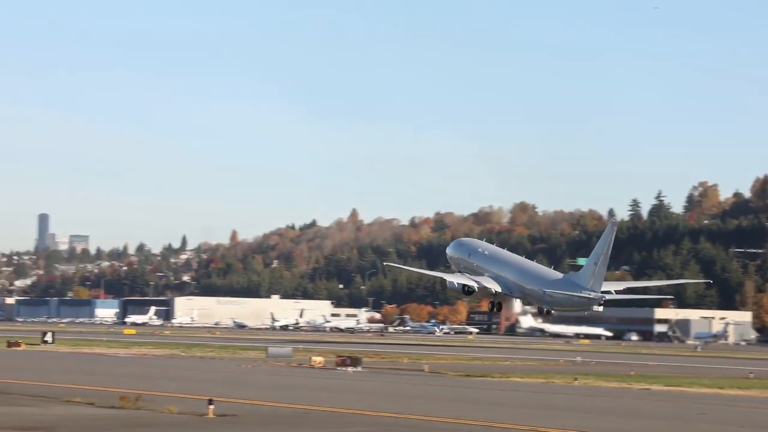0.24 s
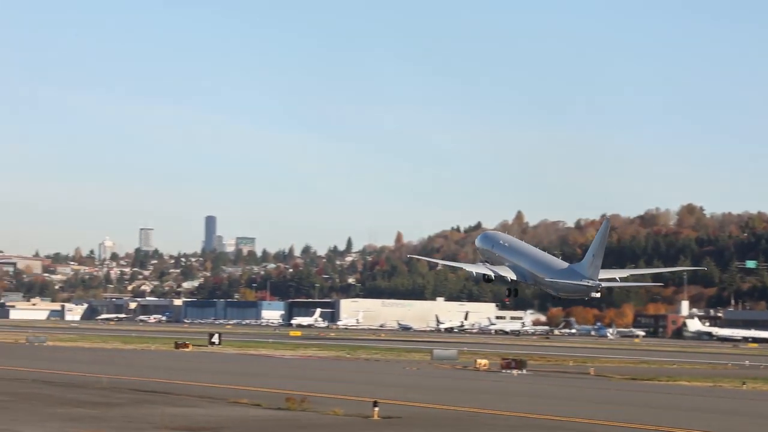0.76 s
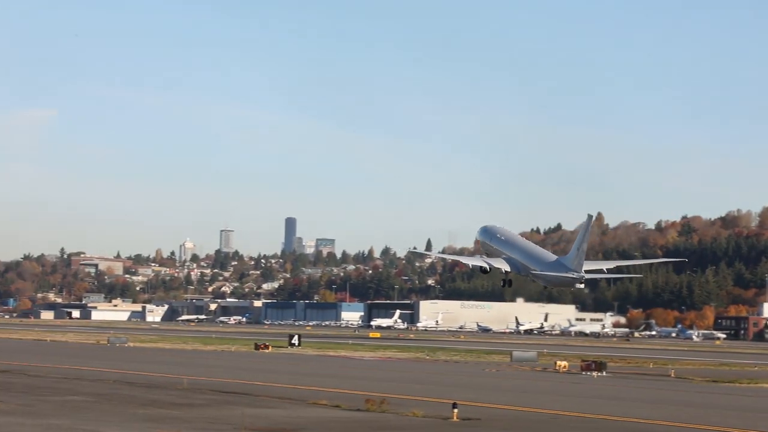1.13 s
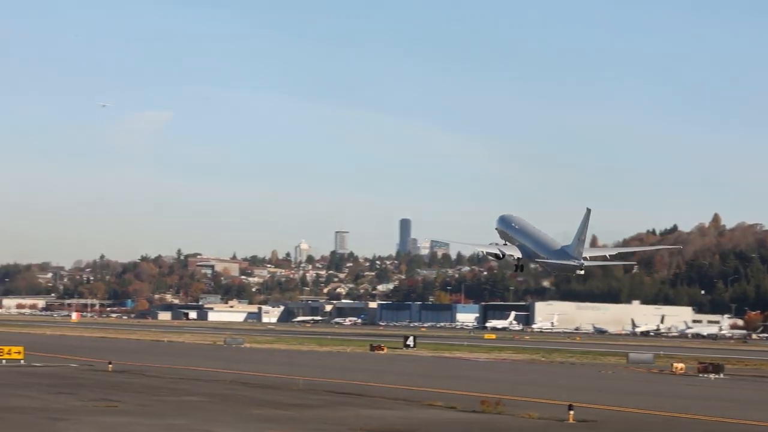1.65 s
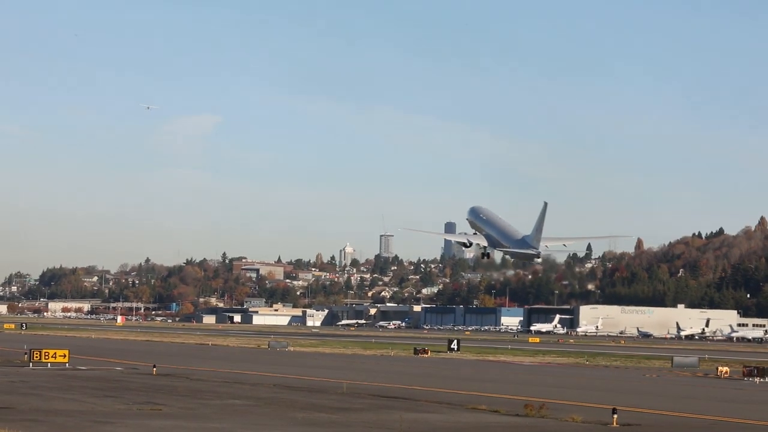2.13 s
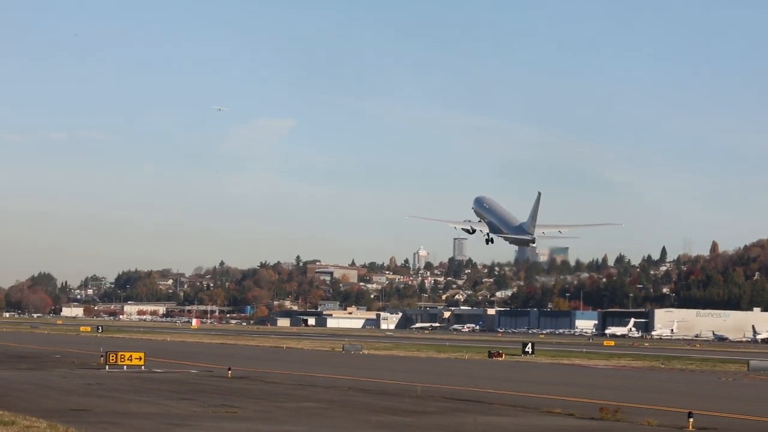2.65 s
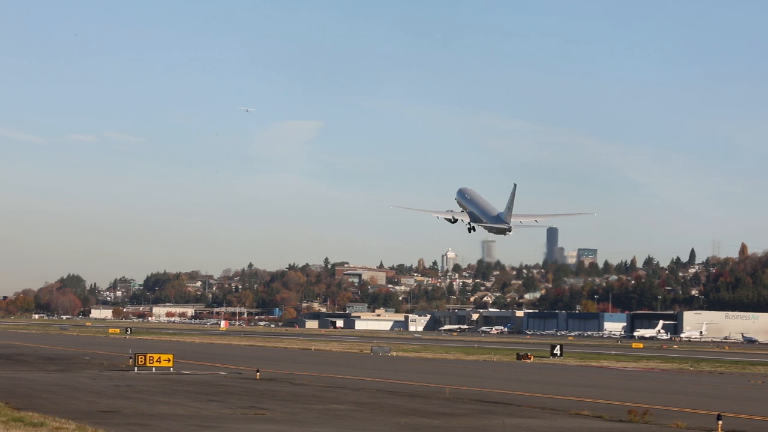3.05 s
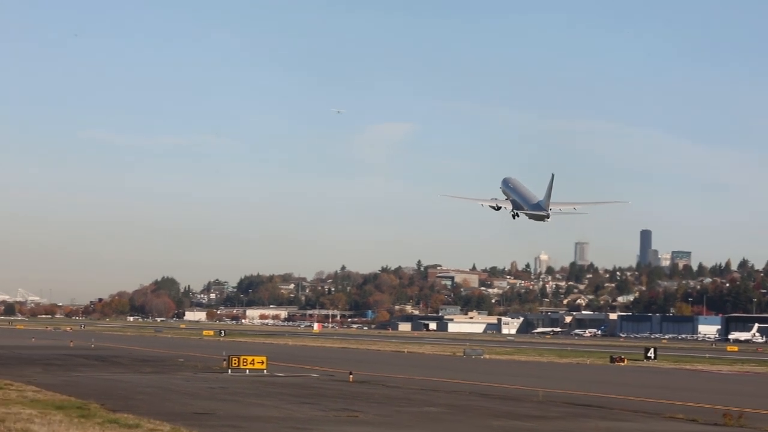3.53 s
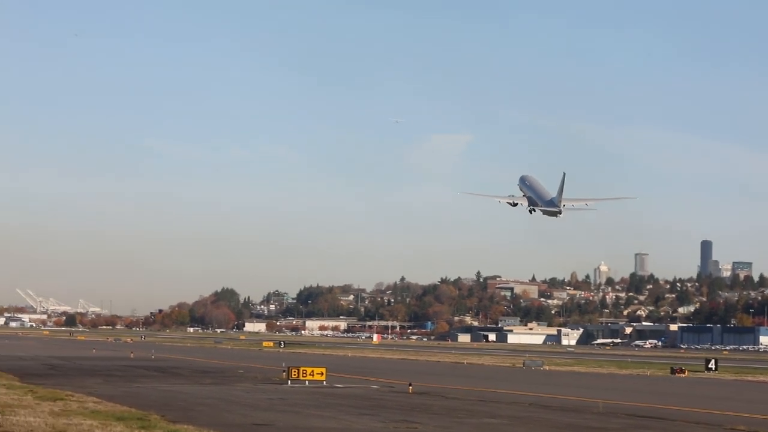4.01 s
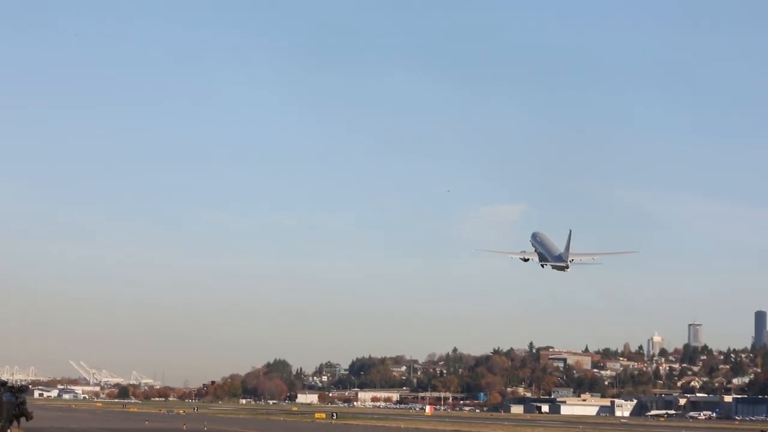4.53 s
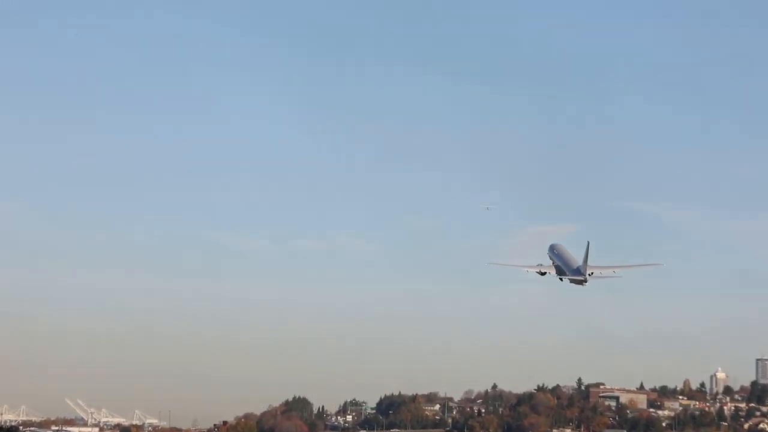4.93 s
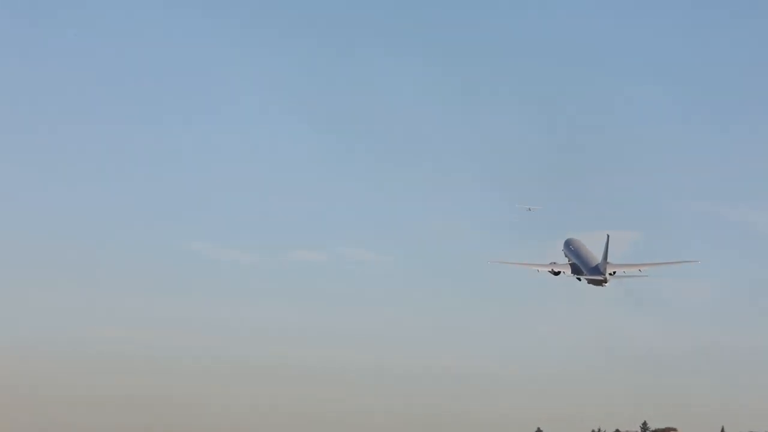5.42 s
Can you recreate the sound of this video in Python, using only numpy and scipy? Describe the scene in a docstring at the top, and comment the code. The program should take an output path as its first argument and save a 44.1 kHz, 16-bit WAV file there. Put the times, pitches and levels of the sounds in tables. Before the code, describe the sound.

A jet airliner has just lifted off and climbs away. It starts with a loud deep rumble, broad roar and airy hiss, already receding. The roar swells and flutters unevenly, its treble dulls, and the hiss drops near four seconds. Just after three seconds a camera part clicks sharply beside the microphone, amid barely audible lens ticks. Open airfield, with a hollow tarmac reflection and low roar returning from around.

```python
"""Jet climbing away from a runway

A jet climbs away, heard from the ground behind it. All its sound is noise shaped by frequency:
a deep rumble, a broad roar, and a hiss that the air dulls as the distance grows.
The echo off the tarmac cuts notches that sink over time. A low roar also comes back from around the field.
Close by, a camera clicks once (short ringing tones), and it and its lens motor tick faintly (noise bursts)."""
import sys
import numpy as np
from scipy import signal
from scipy.fft import rfft, irfft, next_fast_len
from scipy.io import wavfile
from scipy.ndimage import uniform_filter1d, map_coordinates

SR = 44100
rng = np.random.default_rng(int(sys.argv[2]) if len(sys.argv) > 2 else 0)


def digitize_waveform(pressure):
    """Quantize a signal to 16-bit integers and store it at the path in sys.argv[1].

    Rows of a 2-D input are taken as channels; values are limited to [-1, 1].
    """
    field = np.atleast_2d(pressure).T
    bounded = np.clip(field, -1, 1)
    quanta = np.round(bounded * 32767).astype(np.int16)
    wavfile.write(sys.argv[1], SR, quanta)


N = 250047

# Colour of the faint microphone hiss: (frequency [Hz], relative level per Hz [dB])
MIC_HISS_SPECTRUM = [(4000, 1.5), (11800, -.5), (12200, -28), (15000, -48)]
# Colour of the low roar coming back from around the field: (frequency [Hz], relative level per Hz [dB])
FIELD_SPECTRUM = [(15, -26.7), (28, -12), (48, 2.5), (80, -0.6), (150, -7), (260, -11), (330, -14),
                  (430, -25.6), (700, -44.5), (2000, -93.5)]
# Separate dry ticks of the camera: single ticks, and the stronger lens motor steps:
# (time [s], level [dB])
DRY_TICKS = [(.2645, -73), (.3483, -72), (.581, -76), (.649, -76), (1.8903, -79), (1.9411, -76.5),
             (1.9586, -76.5), (2.028, -78), (2.0464, -72), (3.0657, -78), (3.1485, -76), (3.3151, -76),
             (3.3979, -76), (5.4738, -60)]
# Runs of faint lens motor steps: (start [s], end [s], average level [dB])
LENS_STEP_RUNS = [(1.889, 2.1, -86), (3.05, 3.43, -79)]
# Colour of the steps in the runs: (frequency [Hz], relative level per Hz [dB])
STEP_SPECTRUM = [(2000, -9.5), (4500, 2), (5600, -8), (7400, -4.5), (9500, -16), (12000, -27.5),
                 (13000, -45)]
# Colour of the separate dry ticks: (frequency [Hz], relative level per Hz [dB])
TICK_SPECTRUM = [(2000, -12.5), (3700, -1.5), (4700, -7.5), (5400, -5), (6000, 3.5), (7000, -3),
                 (8000, -13), (9700, -2), (11000, -9), (12000, -22), (12800, -45)]
# Sharp click by the microphone: (time [s], level [dB])
SHARP_CLICKS = [(3.2327, -19)]
# Ringing tones of the small hard part that clicks:
# (frequency [Hz], level within the click [dB], time to fall 60 dB [s])
CLICK_TONES = [(2420, 5, .0065), (2763, 3, .0084), (2995, -8.9, .015), (3614, -13.3, .018),
               (4334, -9.5, .0145), (5740, -27.5, .013), (6203, -25.3, .014), (7385, -25, .011),
               (7300, -48, .08), (9004, -24.7, .007), (9505, -26.4, .0078), (11450, -18.2, .0034),
               (13175, -33, .007), (14238, -18, .0024)]
# Colour of the deep rumble: (frequency [Hz], relative level per Hz [dB])
RUMBLE_SPECTRUM = [(20, -31), (40, -16.5), (62, -0.7), (90, 0.15), (130, 1), (200, -3.5), (280, -13.5),
                   (400, -23.5), (800, -93.5)]
# Colour of the mid-range roar: (frequency [Hz], relative level per Hz [dB])
ROAR_SPECTRUM = [(100, -10.5), (300, -1.2), (500, -3.5), (780, -2), (1000, -5), (1300, -7), (1750, -13.5),
                 (2200, -24), (3000, -30), (3600, -35.5), (4200, -50), (5200, -55.5), (7000, -71)]
# Colour of the exhaust hiss: (frequency [Hz], relative level per Hz [dB])
HISS_SPECTRUM = [(200, -11.5), (500, -3), (900, -10.5), (1230, -10.5), (1600, -20), (1950, -12.5),
                 (2500, -18), (3150, -19), (3500, -27.5), (4000, -33.5), (4600, -38), (5500, -47),
                 (7000, -58.5), (11000, -90)]
# Level of the roar before the swells: (time [s], level [dB])
ROAR_LEVELS = [(0.0, -37.5), (0.6, -41), (1.1, -46), (1.6, -43), (2.2, -46.7), (3.15, -42.9), (3.7, -44),
               (4.4, -45.5), (5.67, -44)]
# The hiss surges as the air carries it better: (time [s], half length [s], gain [dB])
HISS_SURGES = [(0.167, .07, 1), (.45, 0.057, 2), (1.201, 0.17, 2), (5.33, 0.12, 3.5)]
# Roar and hiss swell or dip for a moment in one band:
# (time [s], half length [s], centre frequency [Hz], gain [dB])
BAND_SWELLS = [(0.078, 0.2, 596, 1.5), (.1, .2, 4080, 1.5), (.65, 0.17, 135, 2), (0.858, .14, 85, 6),
               (1.101, 0.38, 817, 5.5), (1.148, .35, 245, 7.5), (1.5, 1, 4700, -3.7), (1.702, 0.44, 441, 8),
               (2.15, .4, 154, 3.5), (2.6, .5, 522, 2), (2.7, .65, 1265, 5.5), (3.1, .6, 860, -2),
               (3.299, .7, 305, 5.5), (4.25, .2, 72, 2), (4.9, .5, 178, 5), (5.45, .5, 790, 3),
               (5.5, .35, 1600, 3.2)]
# Share of the tarmac echo that stays in step with the direct sound: (frequency [Hz], share [0-1])
ECHO_SHARE = [(100, 0.31), (175, 0.92), (300, 0.42), (450, .4), (800, .18), (1300, 0)]

STEPS_PER_S = 60  # lens motor steps in a run
# Flight path: distance to the side, distance already past the listener at 0 s, speed
SIDE_M, PAST_M, SPEED_M_PER_S = 90, 181, 74.3
# Base levels, before the changes over time
RUMBLE_DB, HISS_DB = -20, -38.5
# The tail turns to the listener: middle of the turn, how gradual it is, drop of the hiss
TAIL_ON_S, TURN_S, HISS_DROP_DB = 3.82, .26, 17.5
AIR_DB_PER_KHZ_M = 0.0157  # treble loss per kHz above the knee and per metre flown away
SWELL_OCTAVES = .26  # half width of a swell in pitch
# Delay of the echo: at 0 s, then its growth with time and with time squared
LAG_MS, LAG_GROWTH_MS_PER_S, LAG_GROWTH_MS_PER_S2 = 0.65, 0.25, 0.027
TOP_HZ = 16800  # nothing is kept above this


def amp(db):
    """Turn decibels into a gain."""
    return 10 ** (np.asarray(db) / 20)


def unit(x):
    """Scale to an average strength (rms) of 1."""
    return x / np.sqrt(np.mean(x ** 2) + 1e-20)


def along(points, hz):
    """Read a table of (frequency, value) points on a log frequency axis."""
    point_hz, values = np.transpose(points)
    return np.interp(np.log(hz + 1), np.log(point_hz + 1), values)


def wobble(rate):
    """A smooth random curve through 'rate' random points a second."""
    points = rng.standard_normal(int(N * rate / SR) + 4)
    return map_coordinates(points, [np.arange(N) * rate / SR])


def filtered(x, response):
    """Pass x through a gain that depends on frequency only."""
    size = next_fast_len(N + SR // 4)
    hz = np.fft.rfftfreq(size, 1 / SR)
    return irfft(rfft(x, size) * response(hz), size)[:N]


def swept(x, gain):
    """Pass x through a gain that changes with frequency and time."""
    hz, t, spectrum = signal.stft(x, SR, nperseg=1024, noverlap=768)
    _, shaped = signal.istft(spectrum * gain(hz[:, None], t), SR, nperseg=1024, noverlap=768)
    return shaped[:N]


def turbulence(spectrum):
    """Random noise coloured by a spectrum table, at rms 1."""
    white = rng.standard_normal(N)
    return unit(filtered(white, lambda hz: amp(along(spectrum, hz))))


def airfield(level_db=-33.5):
    """Low roar rolls back from hangars and hillside: coloured noise at a steady level."""
    return amp(level_db) * turbulence(FIELD_SPECTRUM)


def tick_envelope(rows, t60, attack_s=.0003):
    """A quick rise and a decay (60 dB in t60 seconds) for each (time, level) row."""
    t = np.arange(SR // 20) / SR
    out = np.zeros(N + SR)
    for start, db in rows:
        burst = amp(db - 60 * t / t60) * (1 - np.exp(-t / attack_s))
        out[round(start * SR):][:len(t)] += burst
    return out[:N]


def handling(tick_t60=.014, step_t60=.032, scatter_db=2):
    """Dry camera ticks are noise bursts without ring; runs of lens steps are even in time, not in level."""
    steps = []
    for start, end, db in LENS_STEP_RUNS:
        for s in np.arange(start, end, 1 / STEPS_PER_S):
            steps.append((s, db + scatter_db * rng.standard_normal()))
    ticks = tick_envelope(DRY_TICKS, tick_t60) * turbulence(TICK_SPECTRUM)
    return ticks + tick_envelope(steps, step_t60) * turbulence(STEP_SPECTRUM)


def clicks(attack_s=0.00083, crack_db=-35, crack_t60=0.009, tail_db=-60, tail_t60=.05, dull_hz=14000):
    """A tiny noise crack with a few short ringing tones leaves a faint noisy tail."""
    out = np.zeros(N + SR)
    t = np.arange(SR // 8) / SR
    for start, db in SHARP_CLICKS:
        ring = sum(amp(level - 60 * t / t60) * np.sin(2 * np.pi * hz * t)
                   for hz, level, t60 in CLICK_TONES)
        crack_decay = amp(crack_db - 60 * t / crack_t60)
        tail_decay = amp(tail_db - 60 * t / tail_t60)
        crack = (crack_decay + tail_decay) * rng.standard_normal(len(t))
        out[round(start * SR):][:len(t)] += amp(db) * (ring + crack) * (1 - np.exp(-t / attack_s))
    return filtered(out[:N], lambda hz: 1 / np.sqrt(1 + (hz / dull_hz) ** 6))


def distance(t):
    """Metres along the ground from listener to jet: steady speed, fixed distance to the side."""
    return np.hypot(SIDE_M, PAST_M + SPEED_M_PER_S * t)


def spreading_db(t):
    """Sound pressure falls as one over the distance; 0 dB at the start."""
    return 20 * np.log10(distance(0) / distance(t))


def tail_on(t):
    """Glide from 0 (jet heard from the side) to 1 (heard from behind)."""
    return 1 / (1 + np.exp((TAIL_ON_S - t) / TURN_S))


def air_loss(hz, t, knee_hz=2620):
    """The air soaks up the top of the hiss, more so as the jet gets farther away."""
    khz_above_knee = np.maximum(hz - knee_hz, 0) / 10 ** 3
    return amp(-AIR_DB_PER_KHZ_M * (distance(t) - distance(0)) * khz_above_knee)


def shimmer(x, depth_db):
    """Uneven air along the path strengthens and weakens random patches of the spectrum."""
    def patches(hz, t):
        """Random gains, smoothed over frequency and then over time."""
        field = uniform_filter1d(rng.standard_normal((len(hz), len(t))), size=9, axis=0)
        return amp(depth_db * unit(uniform_filter1d(field, size=18, axis=1)))
    return unit(swept(x, patches))


def swells(hz, t):
    """Gain of the passing swells and dips, smooth in time and pitch."""
    total_db = 0
    for s, half_s, centre_hz, db in BAND_SWELLS:
        octaves = np.log2((hz + 1) / centre_hz)
        total_db = total_db + db * np.exp(-((t - s) / half_s) ** 2 - (octaves / SWELL_OCTAVES) ** 2)
    return amp(total_db)


def ground_echo(hz, t, phase=1.16):
    """Direct and reflected sound interfere; the ground turns the phase [rad] and the lag grows."""
    lag_ms = LAG_MS + LAG_GROWTH_MS_PER_S * t + LAG_GROWTH_MS_PER_S2 * t ** 2
    share = np.clip(along(ECHO_SHARE, hz), 0, .95)
    return np.sqrt(1 + share * np.cos(2 * np.pi * hz * lag_ms / 10 ** 3 + phase))


def rumble(throb_db=0.57, build_db=2.9, build_s=0.27):
    """Large eddies make low noise that builds as the plume swings this way, throbs and fades away."""
    t = np.arange(N) / SR
    build_up_db = -build_db * np.exp(-t / build_s)
    level_db = RUMBLE_DB + spreading_db(t) + build_up_db + throb_db * wobble(14)
    return amp(level_db) * turbulence(RUMBLE_SPECTRUM)


def exhaust():
    """Finer eddies make roar and hiss; the hiss goes sideways, so it drops as the tail turns to us."""
    t = np.arange(N) / SR
    roar_db = np.interp(t, *np.transpose(ROAR_LEVELS))
    surge_db = sum(db * np.exp(-((t - s) / half_s) ** 2) for s, half_s, db in HISS_SURGES)
    hiss_db = HISS_DB + spreading_db(t) - HISS_DROP_DB * tail_on(t) + surge_db
    flutter_db = 0.31 * wobble(16) + .2 * wobble(5)  # shared by roar and hiss
    roar_noise = shimmer(turbulence(ROAR_SPECTRUM), depth_db=0.96)
    hiss_noise = swept(shimmer(turbulence(HISS_SPECTRUM), depth_db=0.64), air_loss)
    roar = amp(roar_db + flutter_db) * roar_noise
    hiss = amp(hiss_db + flutter_db) * hiss_noise
    return swept(roar + hiss, swells)


def scene():
    """All the distant roar gets the tarmac echo; the click and the handling are close and do not."""
    distant = swept(airfield() + rumble() + exhaust(), ground_echo)
    return (distant + handling() + clicks())[None]


def record(dry, floor_db=-92.0):
    """The microphone adds faint hiss; the sound fades in and out in 4 ms and stops at a top frequency."""
    mic = dry[0] + amp(floor_db) * turbulence(MIC_HISS_SPECTRUM)
    fade_in = np.sin(np.pi / 2 * np.minimum(np.arange(N) / SR / .004, 1)) ** 2
    faded = mic * fade_in * fade_in[::-1]
    # the gain slopes down to zero over the last 1000 Hz below the limit
    return filtered(faded, lambda hz: np.clip((TOP_HZ - hz) / 10 ** 3, 0, 1))[None]


dry = scene()
out = record(dry)
digitize_waveform(out)
```